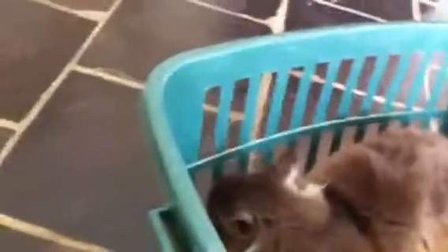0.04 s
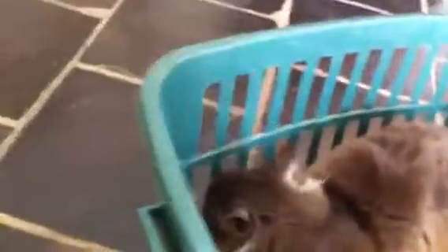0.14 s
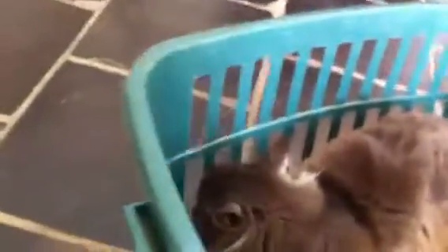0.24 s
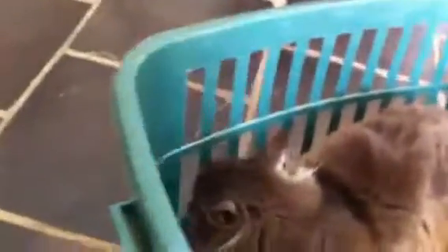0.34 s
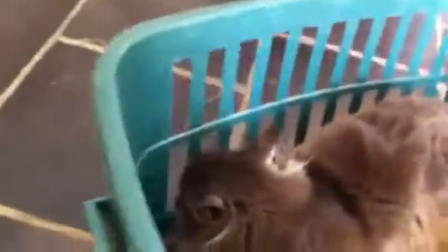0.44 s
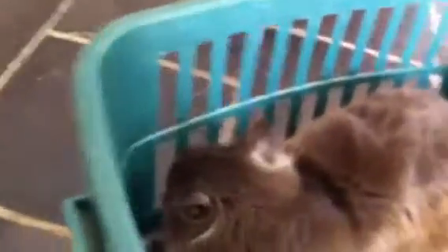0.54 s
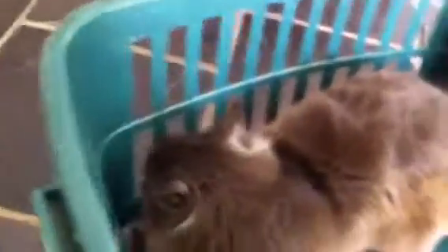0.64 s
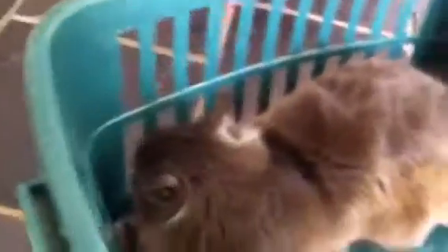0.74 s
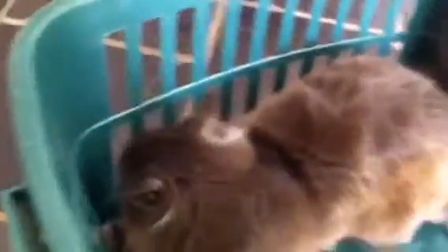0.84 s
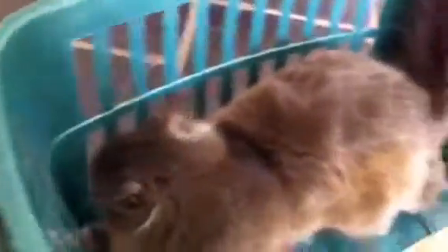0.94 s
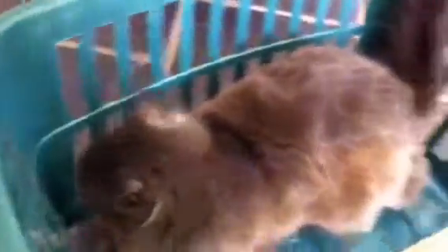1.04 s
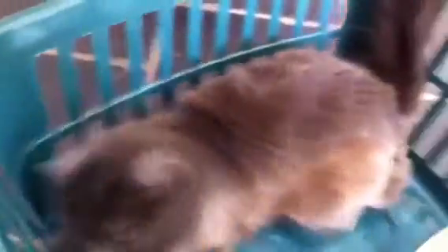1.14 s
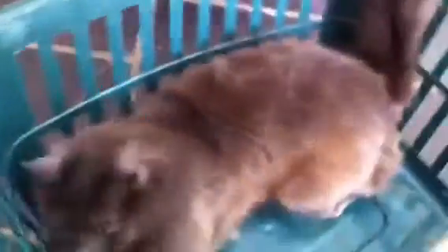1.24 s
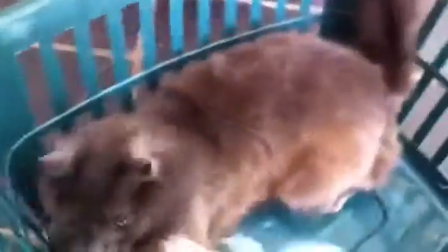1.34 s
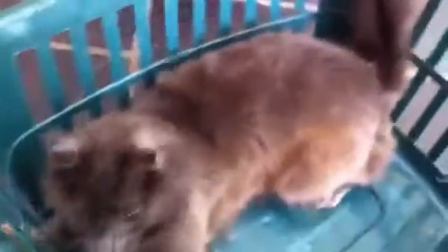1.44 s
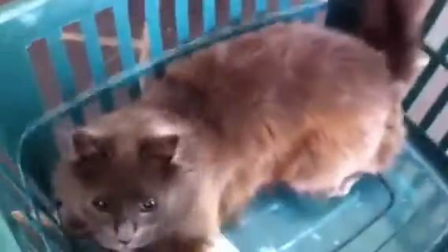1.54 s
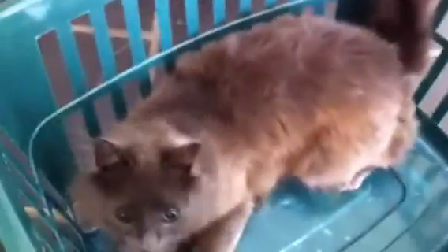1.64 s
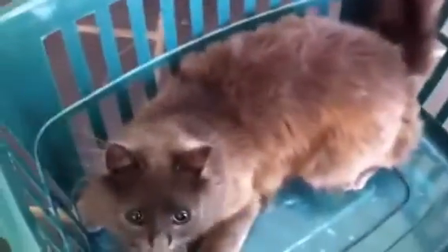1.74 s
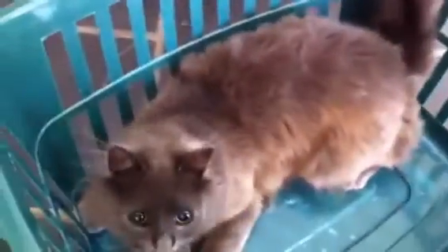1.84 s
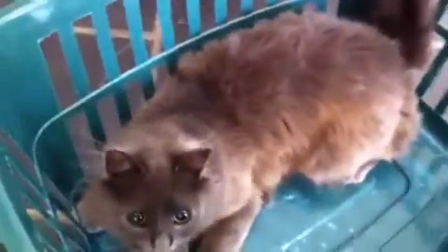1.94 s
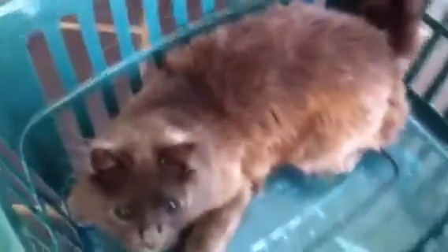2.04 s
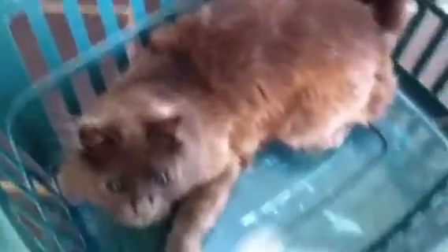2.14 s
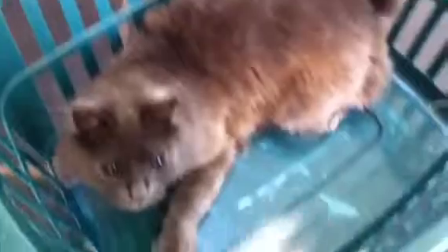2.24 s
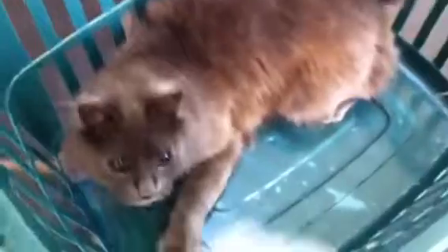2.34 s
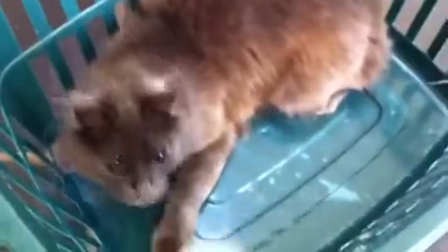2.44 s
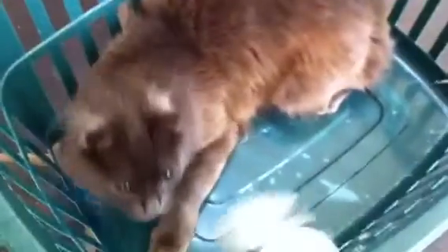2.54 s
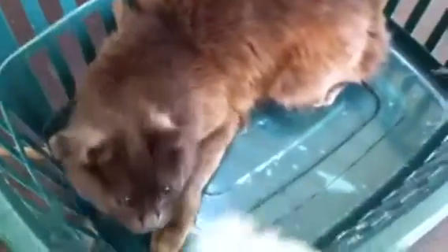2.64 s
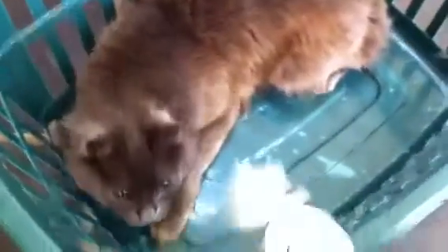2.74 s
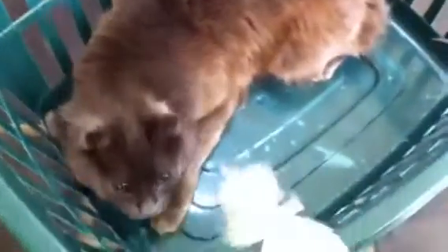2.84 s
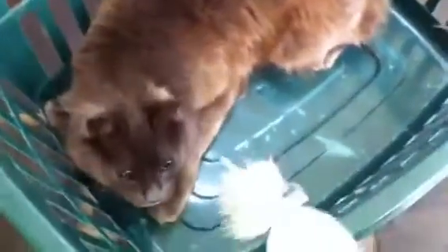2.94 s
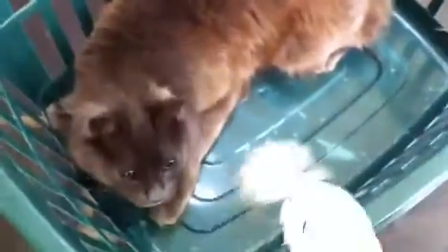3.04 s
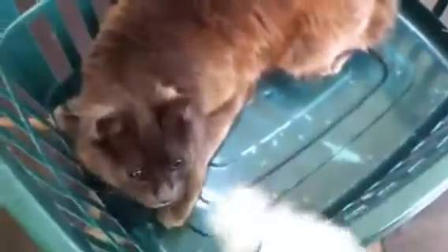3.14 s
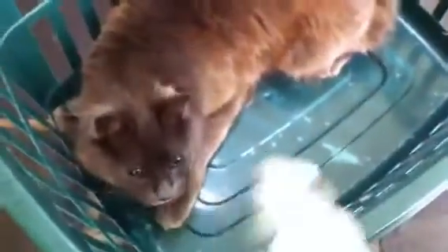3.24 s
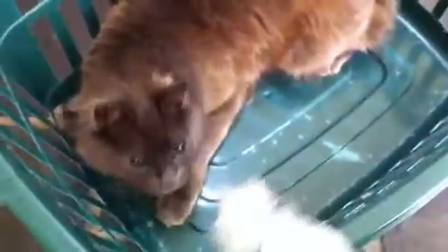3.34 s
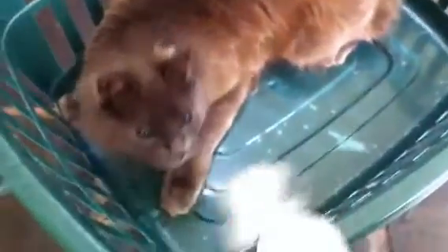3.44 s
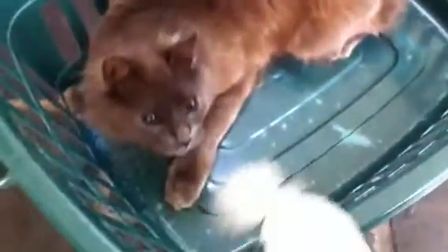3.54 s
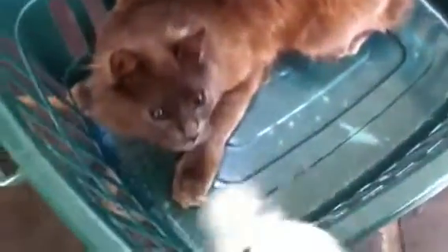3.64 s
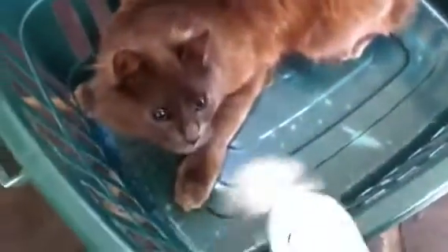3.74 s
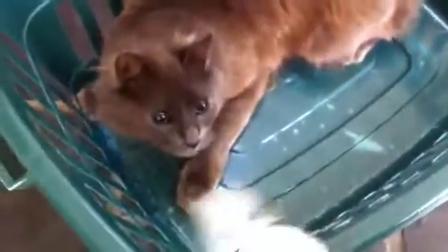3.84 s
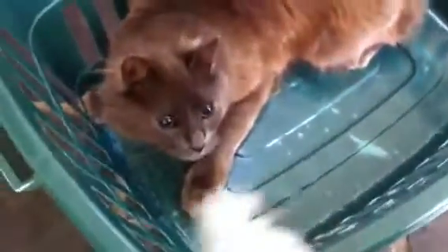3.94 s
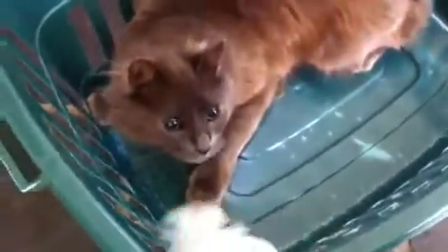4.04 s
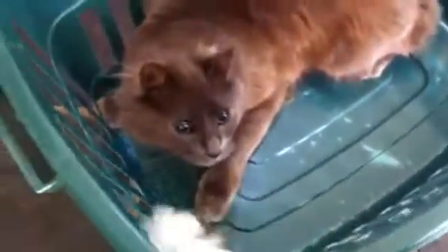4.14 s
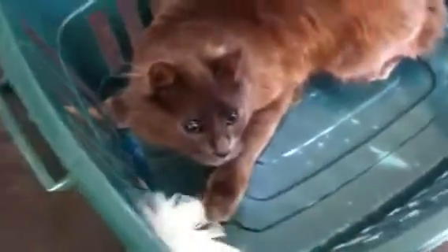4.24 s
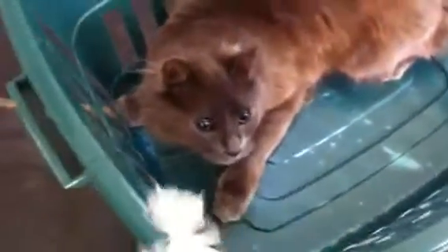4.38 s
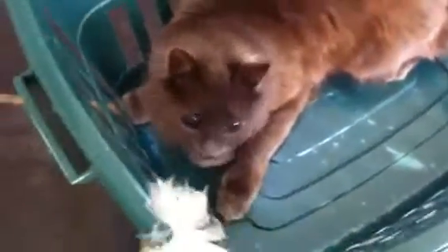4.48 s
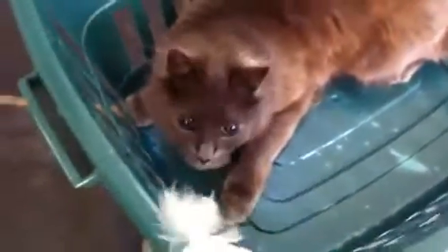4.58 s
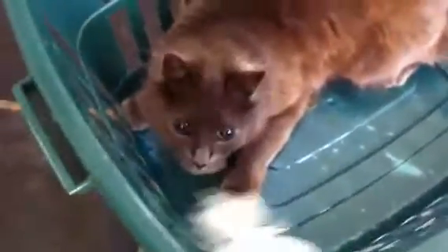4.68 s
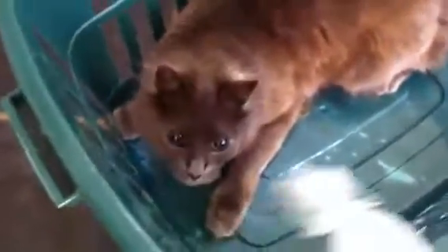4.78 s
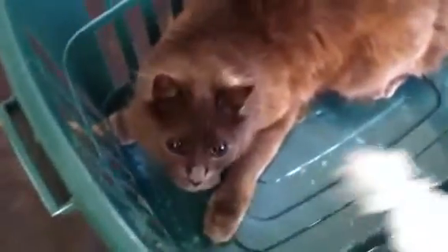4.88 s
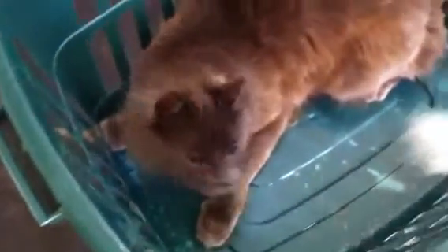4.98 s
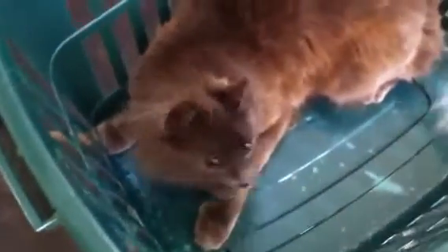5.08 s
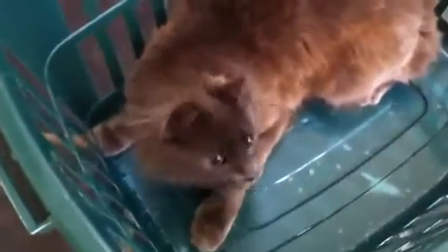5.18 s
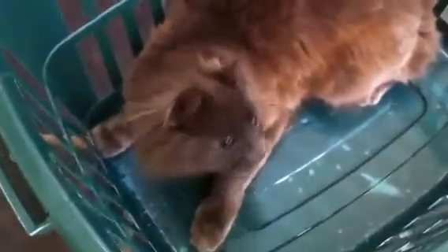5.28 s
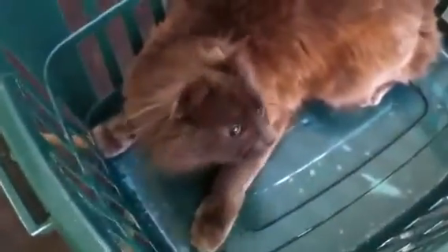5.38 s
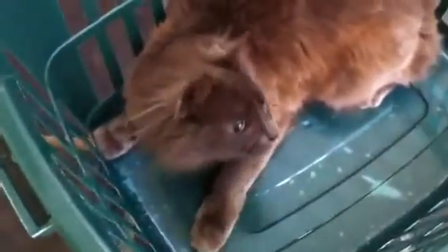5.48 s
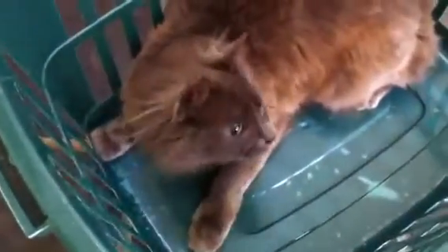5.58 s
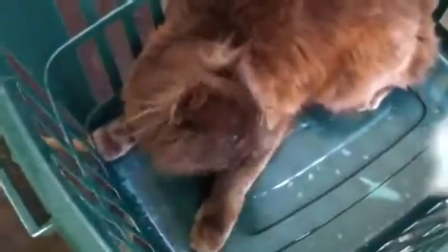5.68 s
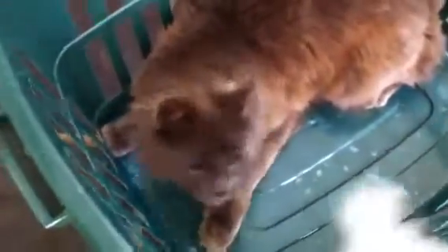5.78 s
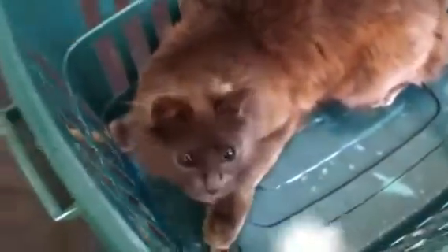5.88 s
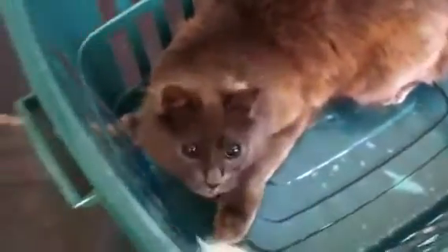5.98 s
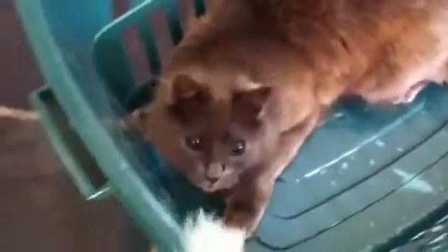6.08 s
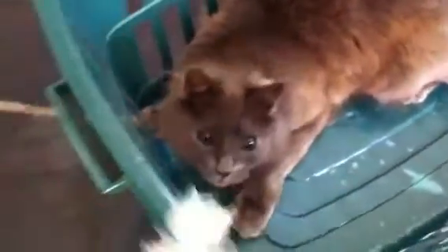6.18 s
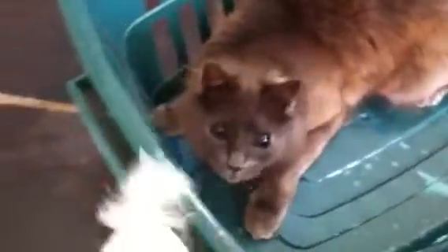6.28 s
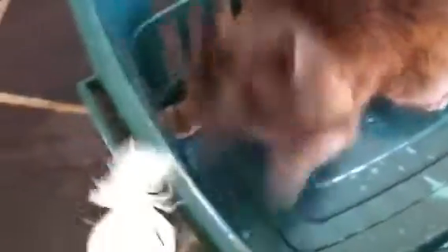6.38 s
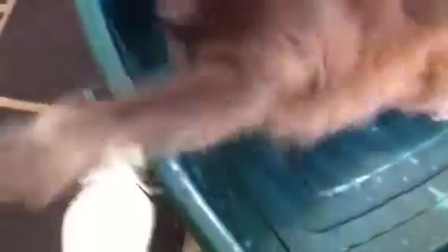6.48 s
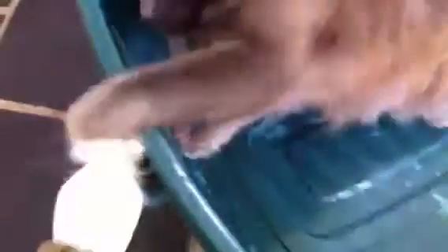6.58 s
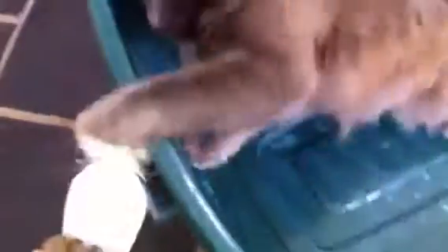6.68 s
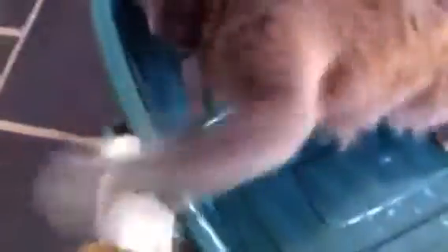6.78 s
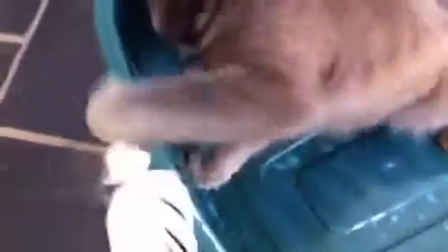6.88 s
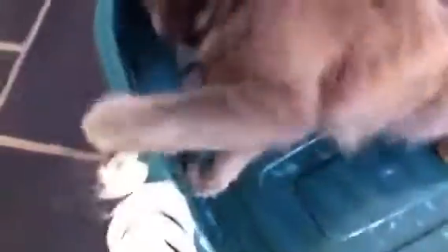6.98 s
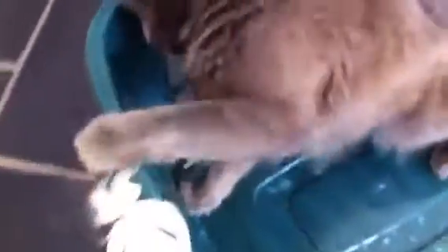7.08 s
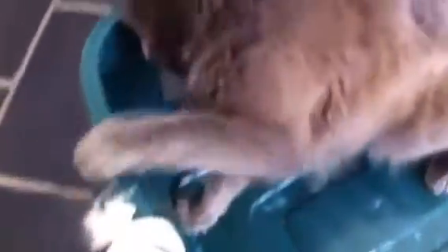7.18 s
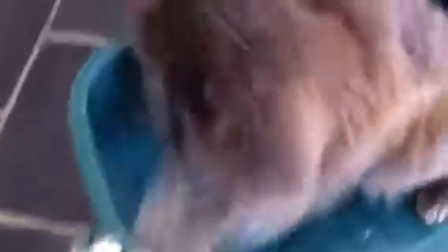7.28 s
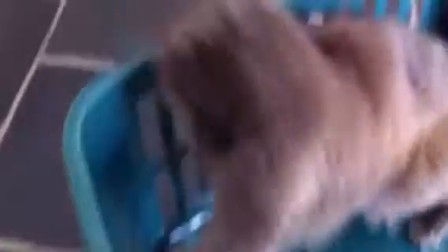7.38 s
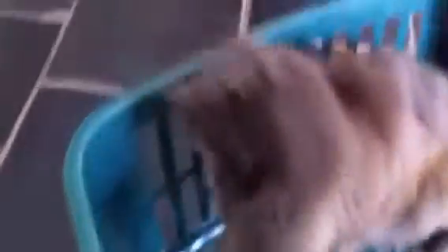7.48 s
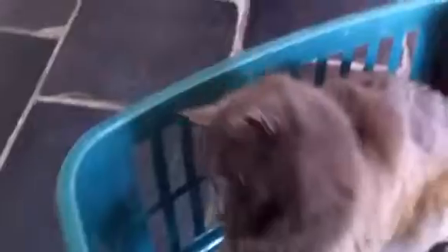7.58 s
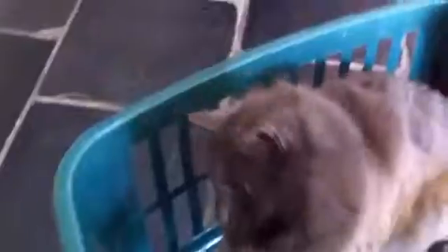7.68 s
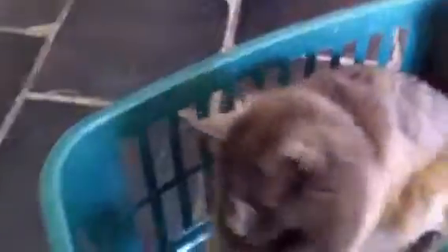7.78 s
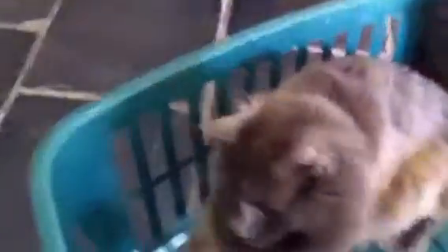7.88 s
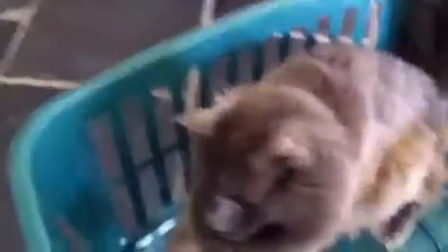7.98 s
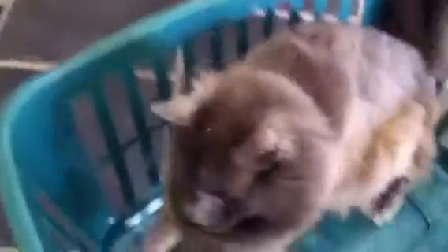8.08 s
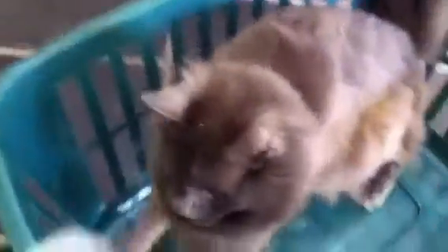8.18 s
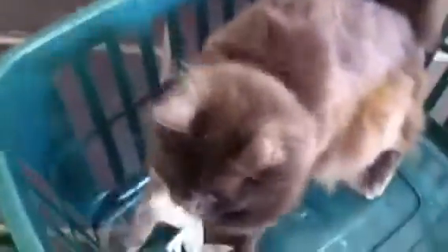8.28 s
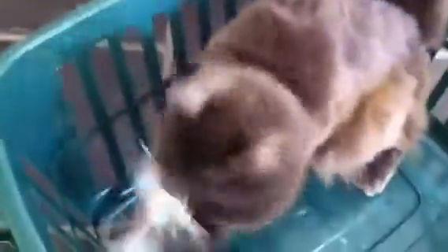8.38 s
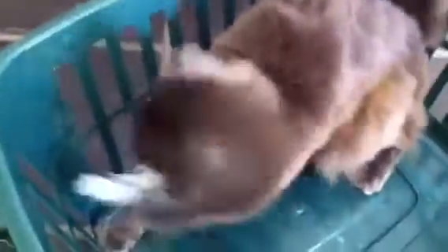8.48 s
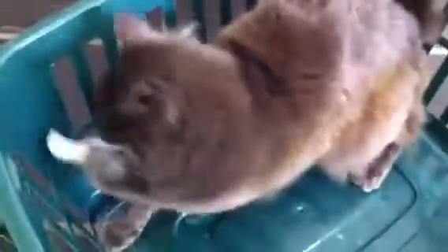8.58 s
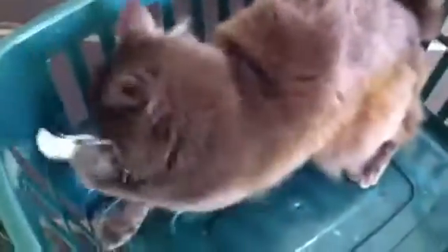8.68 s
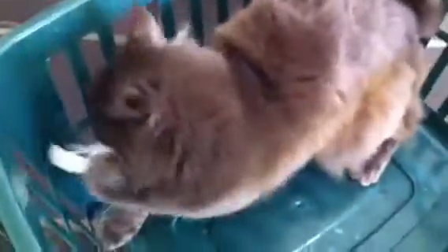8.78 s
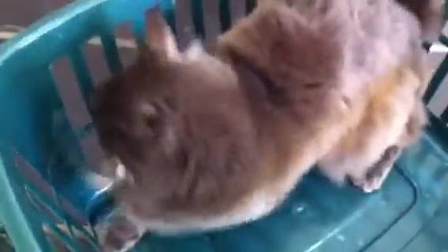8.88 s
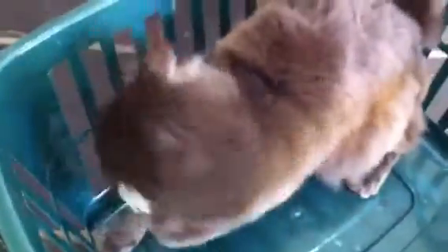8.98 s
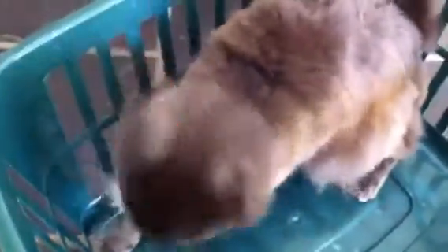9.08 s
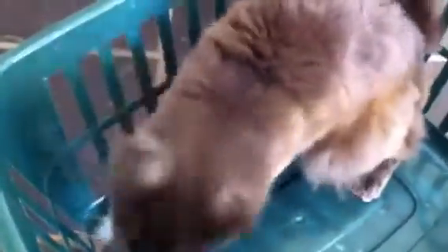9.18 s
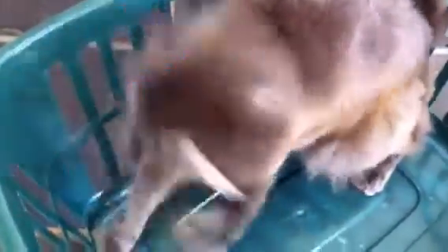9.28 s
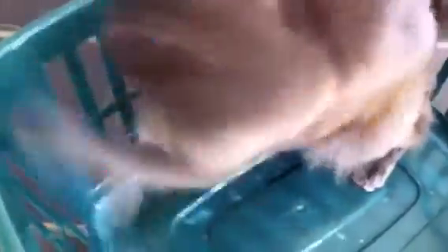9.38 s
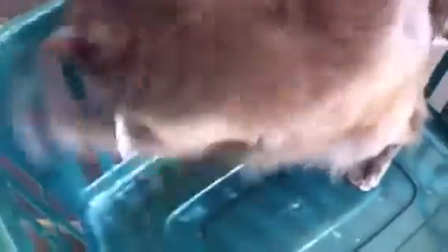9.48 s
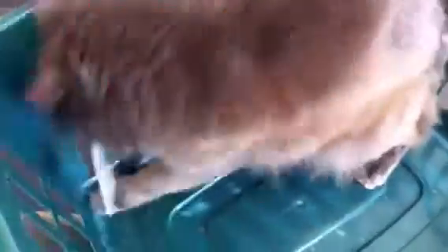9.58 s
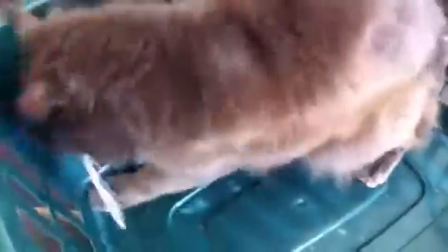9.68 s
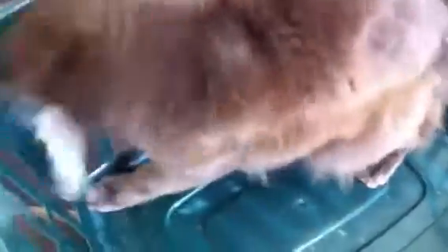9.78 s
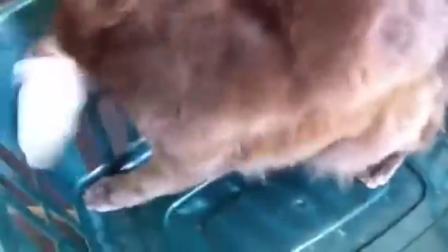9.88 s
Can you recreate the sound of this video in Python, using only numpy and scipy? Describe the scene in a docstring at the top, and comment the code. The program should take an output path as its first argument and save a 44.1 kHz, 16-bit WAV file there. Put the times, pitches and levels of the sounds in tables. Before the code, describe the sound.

Close, hissy brushing and hollow plastic knocks come in short bursts as a cat paws at a toy in a laundry basket.

```python
"""Bright swishes, claw ticks and hollow knocks: a cat chases a tufted toy in a plastic laundry basket.
Tuft and fur snag on the plastic; claws and paws ring the slats, wall and base; twice the basket judders
over the floor. All of it is close, with the short reverberation of a tiled room.
Room rumble, microphone hiss and a few faint far tones lie underneath."""
import sys
import numpy as np
from scipy import signal
from scipy.fft import rfft, irfft, next_fast_len
from scipy.io import wavfile
from scipy.ndimage import uniform_filter1d, map_coordinates

SR = 44100
rng = np.random.default_rng(int(sys.argv[2]) if len(sys.argv) > 2 else 0)


def put_to_file(sound):
    """Save the sound as 16-bit audio at rate SR, in the file named by the first command-line argument."""
    columns = np.atleast_2d(sound).T  # one column per channel
    safe = np.clip(columns, -1, 1)
    whole_steps = np.round(safe * 32767)
    wavfile.write(sys.argv[1], SR, whole_steps.astype(np.int16))


N = 437472

# Room rumble and microphone hiss. Each row: frequency in Hz, relative density in dB.
AIR_SPECTRUM = [(15, -21), (25, -8), (36, -12), (49, -27.5), (153, 0.5), (229, -0.5), (988, -4.5),
                (2690, -12.5), (9570, -15.5), (10400, -17.5), (11600, -14), (14800, -16.5), (16000, -10.5)]
# Far sounds. Each row: peak time in seconds, level in dB.
DRONES, WHINES = [(8.85, -77.5)], [(8.64, -68), (9.42, -72)]
RUSHES = [(8.55, -66.5), (8.95, -76), (9.42, -69)]
# Decay of the tiled room. Each row: frequency in Hz, T60 in seconds.
ROOM_DECAY = [(200, 0.61), (1400, 0.47), (4000, 0.43), (12000, 0.37)]
# Colour of what reaches the room's walls. Each row: frequency in Hz, gain in dB.
ROOM_COLOUR = [(300, 0), (1100, -2), (1650, 1), (2300, 0), (3500, -3), (6000, -2), (10000, -1)]

# Modes of the basket's loaded base, wall and slats. Each row: centre in Hz, width in Hz, gain in dB.
BASE_MODES = [(91, 24, -7.5), (157.6, 14.6, 2), (219, 32, 1.5), (305.6, 45, 2.5)]
WALL_MODES = [(427, 230, -4.5), (594, 143, 0.5), (697, 82, 0), (805, 95, -2), (1027, 223, -1.5),
              (1183, 99, 2.5)]
SLAT_MODES = [(1285, 280, 0.5), (1577, 152, 4.5), (1730, 246, 3), (2170, 400, -1.5), (2900, 620, -1.5),
              (3607, 300, 2), (4140, 580, -3), (5210, 520, -1.5), (6300, 1460, -5.5)]
# Basket lurches over the tiles. Each row: peak time in seconds, level in dB, slide in seconds.
LURCHES = [(6.635, -47, 0.09), (6.948, -50.5, 0.09)]

# Bright hiss of brushing, coloured by the microphone housing's resonant peaks.
# Each row: frequency in Hz, relative density in dB.
HISS_AT_MIC = [(1500, -32), (2500, -10.5), (3600, -3), (4700, -8), (6100, 2.5), (7400, -8.5), (9000, 2.5),
               (10400, -1), (11900, 6), (13200, 2), (14500, 2), (15400, -2.5), (16500, -6.5)]
# The tuft's echo off the basket. Each row: time in seconds, lag in milliseconds.
ECHO_LAG = [(0, 1.7), (4.75, 1.56), (5.5, 1.64), (5.6, 1.7), (5.8, 1.3), (6.15, 1.58), (9.92, 1.06)]
# Top treble of the swish. Each row: time in seconds, gain in dB.
SHEEN = [(0, -3), (5.5, -5.5), (5.9, -4), (6.08, 0), (6.2, -12), (6.5, -11), (6.9, -4), (7.2, 1.5),
         (8.3, 1), (9, -5), (9.92, 8.5)]
# Hollow ring of the slats. Each row: time in seconds, level in dB re the scrape.
SLAT_RING = [(0, -25), (3.0, -26), (3.25, -1.5), (3.7, 0), (4, -25), (5.8, -21), (6.0, -1), (6.2, -5),
             (6.4, -25), (9.92, -25)]
# Long rubs of tuft and fur, one curve each. Each row: time in seconds, swish in dB.
RUBS = [
    [(0.45, -78), (0.83, -67), (0.97, -70), (1.06, -64.5), (1.21, -86)],
    [(4.742, -71), (4.752, -53.5), (4.84, -50), (5.04, -53.5), (5.33, -64.5), (5.42, -71.5), (5.58, -85)],
    [(5.58, -86), (5.61, -58.5), (5.74, -59), (5.77, -50.5), (5.85, -57), (5.99, -52), (6.158, -51),
     (6.172, -88)],
    [(6.46, -65), (6.52, -51), (6.64, -49.5), (6.84, -55.5), (6.858, -90)],
    [(8.12, -72), (8.2, -59.5), (8.3, -61), (8.33, -66), (8.42, -74)],
]
# Short flicks of the tuft. Each row: peak time and length in seconds, swish and scrape in dB.
FLICKS = [(0.808, 0.058, -88, -80), (0.988, 0.12, -61, -75), (1.272, 0.096, -72, -63),
          (1.317, 0.12, -60.5, -61), (2.074, 0.25, -69.5, -89), (2.186, 0.048, -52, -67),
          (2.283, 0.045, -68, -85), (2.399, 0.062, -51, -72), (2.453, 0.067, -66, -82),
          (2.552, 0.14, -65, -83), (2.835, 0.12, -56.5, -70), (2.941, 0.12, -57.5, -65.5),
          (3.141, 0.11, -53.5, -66.5), (3.241, 0.12, -53, -69.5), (3.406, 0.11, -53, -67),
          (3.489, 0.12, -56.5, -68), (3.588, 0.12, -55, -69.5), (3.677, 0.094, -59, -72),
          (3.766, 0.093, -56, -74), (3.835, 0.11, -63, -81), (3.948, 0.054, -57.5, -72),
          (4.09, 0.17, -62.5, -68.5), (4.28, 0.14, -68.5, -84), (4.43, .08, -67.5, -87),
          (5.322, 0.015, -66, -68), (5.475, 0.039, -64, -69), (6.402, 0.16, -61, -70.5),
          (6.87, 0.014, -42.5, -70), (6.949, 0.07, -49.5, -66), (7.527, 0.039, -53, -54),
          (7.83, 0.085, -60.5, -78), (8.063, 0.053, -67, -52.5), (8.087, 0.082, -55, -61),
          (8.271, 0.037, -62, -59), (8.308, 0.02, -58, -57), (9.023, 0.064, -53, -62),
          (9.191, 0.077, -59.5, -67.5), (9.39, .043, -70, -77), (9.472, 0.066, -61.5, -69),
          (9.576, 0.036, -55, -52), (9.618, 0.087, -55, -40.5), (9.696, 0.09, -51, -38)]

# Claw ticks on the plastic. Each row: start in seconds, peak in dB, pitch in Hz.
TICKS = [(0.9935, -24.5, 10100), (1.9745, -21, 12900), (1.9821, -28, 11900), (2.181, -32.5, 9300),
         (2.2242, -26.5, 9400), (2.393, -30.5, 11000), (2.767, -43, 11200), (3.41, -32, 11500),
         (3.7511, -33.5, 11900), (3.936, -40, 11400), (5.757, -33, 8890), (5.792, -39, 9000),
         (5.92, -35, 11000), (6.079, -32, 12000), (6.093, -36, 11000), (6.3455, -39, 9660),
         (6.421, -40, 11000), (6.457, -38.5, 11400), (6.5249, -23, 9250), (8.2803, -32, 13000),
         (8.2955, -32, 13500), (8.928, -42, 5300), (9.0164, -25.5, 11300), (9.024, -39, 9000),
         (9.1185, -33.5, 12300), (9.193, -47, 11300), (9.5441, -11.5, 15200)]
# Paw and claw knocks. Each row: start in seconds, slat peak in dB, slat pitch in Hz, wall in dB,
# wall pitch in Hz, thud in dB, edge in dB, rattle T60 in seconds. Wall, thud, edge: re the slat peak.
KNOCKS = [(0.037, -58, 1400, 5, 450, 1, -10, 0.017), (0.5701, -49.5, 1520, -0.5, 1230, -6.5, -17, 0.022),
          (1.053, -52.5, 1860, -3, 1250, -13, 5.5, 0.066), (1.096, -44.5, 3420, -12, 732, -21, -15, 0.072),
          (1.3718, -24.5, 1730, -18, 810, -40, -16, 0.053), (1.3774, -30, 1830, -3, 800, -22, 2.5, 0.038),
          (1.373, -44, 3530, 1.5, 390, -18, 6, 0.055), (1.383, -40, 1720, 7, 840, -29, -2, 0.078),
          (1.415, -40.5, 4140, -1, 790, -17, -13, 0.058), (1.6376, -51, 1550, -1, 1010, -9, 1.5, 0.035),
          (1.7175, -62, 1300, 15.5, 650, 18, -8, 0.019), (1.7909, -42, 1220, 6.5, 667, -11, -2, 0.013),
          (2.3129, -68, 1520, 19, 460, 14.5, 3, 0.016), (2.5, -49, 1300, -8, 595, -19, -2, 0.016),
          (2.961, -55.5, 1700, -4, 600, -8, -10, .02), (2.9477, -51.5, 2590, -9, 510, -5, -12, 0.018),
          (3.0639, -49, 4130, -20, 474, -12, -25, 0.033), (4.819, -58.5, 1300, 0, 1000, -25, -5, 0.025),
          (4.877, -58, 3650, -10, 1000, -25, 3, .015), (4.912, -41.5, 2940, -13, 990, -32, -9, 0.026),
          (4.919, -49, 2850, -1, 910, -25, -12, 0.022), (5.034, -48.5, 3800, -8, 990, -29, 1, 0.028),
          (5.123, -66, 1500, -4, 900, -20, -3, .015), (5.16, -55, 3300, -15, 1000, -25, -8, .015),
          (5.18, -51, 3300, -20, 1000, -25, 2, .02), (5.2034, -50, 3160, -4, 950, -25, -1, 0.046),
          (5.2154, -49, 3170, -1.5, 805, -22, 8, 0.016), (5.319, -63, 3300, -15, 1100, -25, -5, 0.02),
          (5.789, -57, 2900, 3, 1114, -26, 5, 0.022), (5.897, -52, 3000, -22, 1100, -27, 7, 0.02),
          (6.5037, -41.5, 3200, -17, 563, -21, -12, 0.017), (6.6306, -40.5, 1450, 3, 490, -4, -4, 0.012),
          (6.641, -37.5, 1290, -2.5, 740, -4, -19, 0.13), (6.6967, -24.5, 2620, -21, 660, -29, -22, 0.013),
          (6.8403, -41.5, 2200, 0, 990, -13, -13, 0.0074),
          (6.865, -29.5, 2900, -24, 977, -23.5, -13, 0.054), (6.874, -43, 3200, -25, 977, -25, -15, 0.035),
          (6.926, -57, 1400, 8, 704, 5, 16, 0.015), (6.966, -58, 1310, 11, 805, -1, -8, 0.02),
          (6.9412, -35, 1640, -9.5, 533, -19, -16, 0.061), (6.978, -29, 2300, -9, 1300, -25, -4.5, 0.045),
          (7.005, -44, 2880, -6, 1300, -17, -13, 0.13), (7.066, -42, 2570, -9.5, 885, -22, -4.5, 0.16),
          (7.28, -44, 1400, 2, 1060, -15, -3, 0.051), (7.2885, -36, 1830, -11, 1200, -11.5, -15, 0.052),
          (7.4708, -40, 2030, -10.5, 980, -21, 9.5, 0.04),
          (7.489, -26.5, 2150, -20.5, 950, -24.5, 2, 0.024),
          (7.5536, -41.5, 2240, -19, 510, -20, -22, 0.044), (7.7013, -44, 2090, -32, 1180, -21, -25, 0.03),
          (7.7713, -50, 3370, -11, 840, -19, 5, 0.056), (7.787, -40.5, 2040, -15, 592, -14.5, 2, 0.023),
          (7.8088, -36.5, 3380, -14.5, 990, -22, 1, 0.04), (8.0448, -46, 1770, -7, 1110, -10, 5, 0.024),
          (8.0853, -42.5, 4170, -16, 875, -20, -3, .021), (8.282, -48, 2740, -4.5, 487, -3, -6, 0.046),
          (9.311, -45.5, 4900, -19, 1240, -25, 1.5, 0.033), (9.322, -52, 1750, -24, 1190, -10, 5, 0.053),
          (9.4584, -57, 1380, -5, 659, -10, 8, .024), (9.5426, -20, 1520, -13, 527, -37, -6, 0.037),
          (9.5442, -15.5, 2960, -13, 1150, -32, -6, 0.024),
          (9.5494, -26.5, 1610, -9, 1000, -34, 4.5, 0.031), (9.561, -36, 3100, -13, 1200, -25, -7, 0.033),
          (9.575, -38, 1700, -3, 1000, -25, -2, .04), (9.594, -36, 2500, -11, 1100, -25, 1, 0.026),
          (9.628, -32.5, 3300, -2, 1090, -21, -2, 0.027), (9.634, -32, 1600, -1, 980, -23, -6, .04),
          (9.605, -31, 2200, -19, 1000, -23, -7, 0.037), (9.619, -26, 1810, -8, 900, -33, -5, 0.042),
          (9.6133, -21.5, 3430, -16, 1040, -28, -0.5, 0.03), (9.6787, -23, 1510, -5, 1300, -39, -4, 0.012),
          (9.687, -19.5, 1540, -4, 1180, -22, 2.5, 0.03), (9.6958, -30, 1640, -20, 993, -20, 12, 0.029),
          (9.6997, -24, 2230, -20, 1070, -43, 5, 0.034), (9.864, -38, 6300, -33, 1000, -35, -30, .02),
          (9.9013, -35.5, 2517, -15.5, 646, -17, 6, 0.063), (9.9064, -33, 1770, 2.5, 633, -25, 13, 0.049)]


def amp(db):
    return 10 ** (np.asarray(db) / 20)


def unit_rms(x):
    return x / np.sqrt(np.mean(x ** 2) + 1e-20)


def unit_peak(x):
    return x / np.abs(x).max()


def along(points, hz):
    """Interpolate (Hz, value) points on a log axis."""
    knots_hz, values = np.transpose(points)
    return np.interp(np.log(hz + 1), np.log(knots_hz + 1), values)


def curve(points):
    """Interpolate (seconds, value) points per sample; -120 outside them."""
    knots_s, values = np.transpose(points)
    return np.interp(np.arange(N) / SR, knots_s, values, left=-120, right=-120)


def wobble(rate_hz):
    """Smooth curve through random knots."""
    knots = rng.standard_normal(int(N * rate_hz / SR) + 4)
    return map_coordinates(knots, [np.arange(N) * rate_hz / SR])


def swell(peak_s, rise_s, fall_s):
    """Rounded bump of height 1."""
    bump = np.zeros(N)
    span = np.arange(round((peak_s - rise_s) * SR), min(N, round((peak_s + fall_s) * SR)))
    t = span / SR - peak_s
    bump[span] = np.abs(np.cos(np.pi / 2 * t / np.where(t < 0, rise_s, fall_s))) ** 1.85
    return bump


def filtered(x, response):
    """Apply a complex frequency response."""
    size = next_fast_len(len(x) + 2048)
    return irfft(rfft(x, size) * response(np.fft.rfftfreq(size, 1 / SR)), size)[:len(x)]


def resonance(centre_hz, width_hz, hz):
    return 1j * hz * width_hz / (centre_hz ** 2 - hz ** 2 + 1j * hz * width_hz)


def modes(table, hz):
    """Sum of resonances with alternating signs."""
    return sum((-1) ** k * amp(db) * resonance(centre_hz, width_hz, hz)
               for k, (centre_hz, width_hz, db) in enumerate(table))


def patchy(x, depth_db, width_bins):
    """Drifting patches of gain over time and frequency."""
    spectra = signal.stft(x, nperseg=512)[2]
    field = uniform_filter1d(rng.standard_normal(spectra.shape), size=width_bins, axis=0)
    field = uniform_filter1d(field, size=10, axis=1)
    field -= field.mean(axis=0)  # colour shifts, loudness stays
    return signal.istft(spectra * amp(depth_db * unit_rms(field)), nperseg=512)[1][:N]


def air():
    """Room rumble and microphone hiss, gently patchy."""
    noise = patchy(rng.standard_normal(N), depth_db=1.37, width_bins=6)
    return amp(-64) * unit_rms(filtered(noise, lambda hz: amp(along(AIR_SPECTRUM, hz))))


def far_tones(drone_hz=99, whine_hz=602):
    """A low drone, a fuzzy two-partial whine and a dull rush come and go far away."""
    def level(rows, half_s):
        return sum(amp(db) * swell(peak_s, half_s, half_s) for peak_s, db in rows)

    rad_per_hz = 2 * np.pi * np.arange(N) / SR
    whine_rad = whine_hz * rad_per_hz + 1.9 * wobble(13)
    rush = unit_rms(filtered(rng.standard_normal(N), lambda hz: resonance(716, 1050, hz) ** 2))
    drone = np.sin(drone_hz * rad_per_hz + 0.4 * wobble(7.1))
    whine = amp(4.3 * wobble(27)) * (1.1 * np.sin(whine_rad) + np.sin(2 * whine_rad))
    return level(DRONES, 0.63) * drone + level(WHINES, 0.18) * whine + level(RUSHES, 0.13) * rush


def tiled_room(x, delay_samples=180):
    """Each frequency decays at its own rate; the tail is redrawn every quarter second as things move."""
    out, block = np.zeros(N + SR), SR // 4
    for start in range(0, N, block):
        hz, t, spectra = signal.stft(rng.standard_normal(SR // 2), SR, nperseg=256)
        decay = amp(-60 * t / along(ROOM_DECAY, hz)[:, None])
        tail = signal.istft(spectra * decay, SR, nperseg=256)[1][:SR // 2]
        wet = signal.fftconvolve(x[start:start + block], tail / np.linalg.norm(tail))
        out[start + delay_samples:][:len(wet)] += wet
    return out[:N]


def dragging(rise_s=0.039, settle_s=0.099):
    """The base breaks loose, judders over the tiles and settles, sounding its low modes."""
    t, gain = np.arange(N) / SR, 0
    for peak_s, db, slide_s in LURCHES:
        knots_s = [peak_s - rise_s, peak_s, peak_s + slide_s, peak_s + slide_s + settle_s]
        gain += amp(db + np.interp(t, knots_s, [-35, 0, -6, -75], left=-90))
    judder = amp(4.1 * wobble(40)) * rng.standard_normal(N)
    return gain * unit_rms(filtered(judder, lambda hz: modes(BASE_MODES, hz) * resonance(143.5, 33, hz)))


def friction(spread_db, snag_share):
    """Noise plus sparse snags with long-tailed sizes; RMS 1."""
    snags = rng.standard_normal(N) * amp(spread_db * np.minimum(rng.exponential(size=N), 6.5))
    return np.sqrt(1 - snag_share) * rng.standard_normal(N) + np.sqrt(snag_share) * unit_rms(snags)


def strokes(rise_share=0.45):
    """Swish and scrape gains of all rubs and flicks; in a rub the scrape weakly follows the swish."""
    gains = np.zeros((2, N))
    for rub in RUBS:
        swish_db = curve(rub)
        scrape_db = -68.5 + 0.14 * (swish_db + 43)
        gains += amp([swish_db, scrape_db]) * (swish_db > -100)
    for peak_s, length_s, swish_db, scrape_db in FLICKS:
        bump = swell(peak_s, rise_share * length_s, (1 - rise_share) * length_s)
        gains += amp([[swish_db], [scrape_db]]) * bump
    return gains


def brushing(sheen_hz=11500):
    """Fibres snag in clumps: a bright shifting swish, and a duller scrape through the basket walls."""
    swish_gain, scrape_gain = strokes()
    clumps_db = 1.7 * wobble(70) + 1.86 * wobble(250)
    fibres = amp(clumps_db) * patchy(friction(2.9, 0.5), depth_db=1.8, width_bins=14)
    # The echo's comb of notches slides as the tuft moves, and comes and goes as it turns.
    echo = map_coordinates(fibres, [np.arange(N) - curve(ECHO_LAG) * SR / 1000], mode="nearest")
    echo *= 0.35 * amp(3.6 * wobble(9.6))
    swish = filtered(fibres + echo, lambda hz: amp(along(HISS_AT_MIC, hz)))
    treble = filtered(swish, lambda hz: 1 / (1 + (sheen_hz / (hz + 1)) ** 12))
    swish += (amp(curve(SHEEN)) - 1) * treble

    scrape_force = amp(clumps_db + 2.3 * wobble(40)) * friction(0.53, 0.46)
    scrape = filtered(scrape_force, lambda hz: modes(WALL_MODES[3:] + SLAT_MODES, hz) ** 2)
    ring_force = amp(clumps_db + 4.3 * wobble(25)) * friction(2.5, 0.34)
    clearest_modes = [SLAT_MODES[1], SLAT_MODES[5]]
    ring = filtered(ring_force, lambda hz: modes(clearest_modes, hz) ** 2)
    plastic = unit_rms(scrape) + amp(curve(SLAT_RING)) * unit_rms(ring)
    return swish_gain * unit_rms(swish) + scrape_gain * plastic


def struck_panel(force, table, pitch_hz, below_db_oct, above_db_oct, width_ratio):
    """A force wakes the modes near its pitch, each with a slightly random gain; peak 1."""
    woken = []
    for centre_hz, width_hz, db in table:
        octaves = np.log2(centre_hz / pitch_hz)
        rolloff_db = min(below_db_oct * octaves, -above_db_oct * octaves)
        woken.append((centre_hz, width_hz, db + rng.normal(0, 1.02) + rolloff_db))
    width_hz = width_ratio * pitch_hz
    return unit_peak(filtered(force, lambda hz: modes(woken, hz) * resonance(pitch_hz, width_hz, hz)))


def claw_edge(force, pitch_hz):
    """Sharp edge of a contact: a broad band coloured by the microphone housing's peaks; peak 1."""
    def response(hz):
        return resonance(pitch_hz, 1.6 * pitch_hz, hz) ** 2 * amp(0.62 * along(HISS_AT_MIC, hz))

    return unit_peak(filtered(force, response))


def contacts(tick_edge_db=21.5, knock_edge_hz=4150):
    """A snap and a short rattle of force drive slats, wall and base. Returns direct sound, room send."""
    direct, send = np.zeros((2, N + SR))
    t = np.arange(SR // 10) / SR
    thud = unit_peak(filtered(amp(-60 * t / 0.0012), lambda hz: modes(BASE_MODES, hz)))
    # A tick is a strong edge over a faint knock of random pitch.
    hits = [(start_s, db - tick_edge_db, rng.uniform(2440, 5960), -9.5, rng.uniform(344, 1200),
             -19, tick_edge_db, 0.021, pitch_hz) for start_s, db, pitch_hz in TICKS]
    hits += [(*row, knock_edge_hz) for row in KNOCKS]
    for start_s, db, slat_hz, wall_db, wall_hz, thud_db, edge_db, t60_s, edge_hz in hits:
        rattle = amp(-60 * t / t60_s) * (1 - np.exp(-t / 0.0004))
        force = rng.standard_normal((3, len(t))) * rattle
        force[:, round(0.0012 * SR)] += [5.5, 4.5, 6]  # the claw lets go in one snap
        slats = struck_panel(force[0], SLAT_MODES, slat_hz, 5.2, 6.1, width_ratio=0.72)
        wall = struck_panel(force[1], WALL_MODES, wall_hz, 12.3, 13.3, width_ratio=0.93)
        edge = claw_edge(force[2], edge_hz)
        body = slats + amp(wall_db) * wall + amp(thud_db) * thud
        start = round(start_s * SR)
        direct[start:][:len(t)] += amp(db) * (body + amp(edge_db) * edge)
        # The brightest ticks are close and beam past the room's walls.
        send[start:][:len(t)] += amp(db) * (body + amp(min(edge_db, 3)) * edge)
    return direct[:N], send[:N]


def scene():
    """Cat, toy and basket in the room."""
    hits, hits_send = contacts()
    rubbing = brushing() + dragging()
    send = filtered(amp(-5) * hits_send + amp(-9) * rubbing, lambda hz: amp(along(ROOM_COLOUR, hz)))
    return (hits + rubbing + tiled_room(send) + far_tones() + air())[None]


def record(dry, top_hz=15900):
    """The phone's band limit."""
    return filtered(dry[0], lambda hz: hz < top_hz)[None]


dry = scene()
out = record(dry)
put_to_file(out)
```